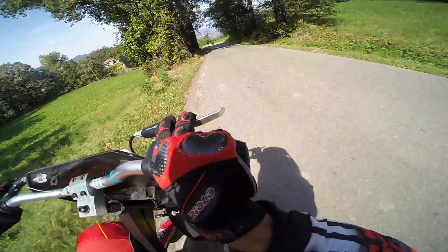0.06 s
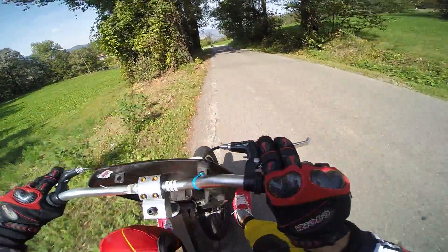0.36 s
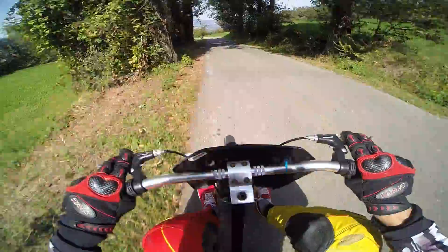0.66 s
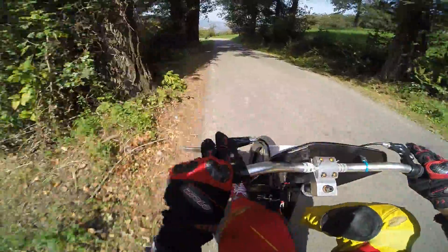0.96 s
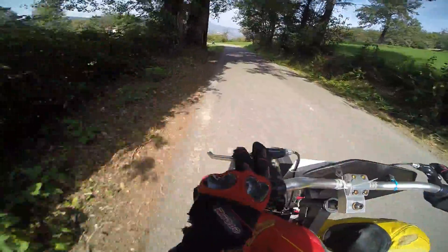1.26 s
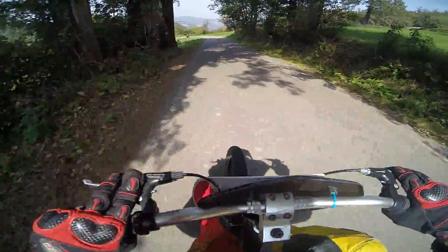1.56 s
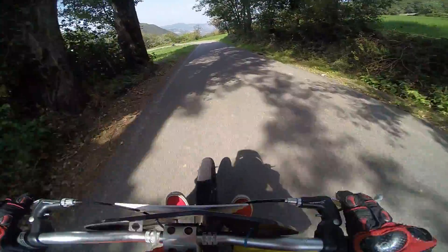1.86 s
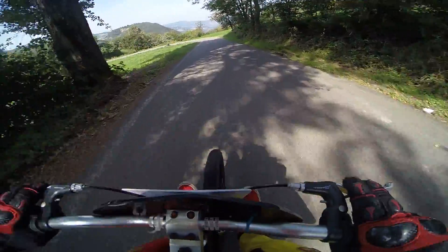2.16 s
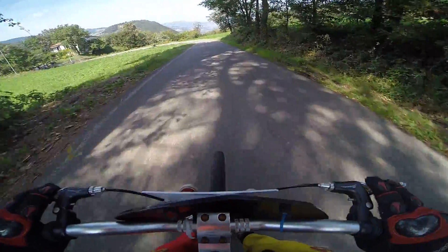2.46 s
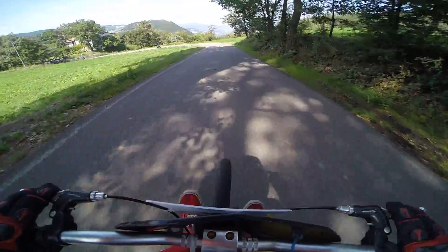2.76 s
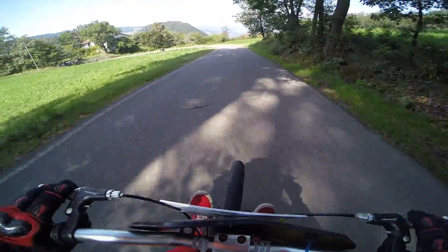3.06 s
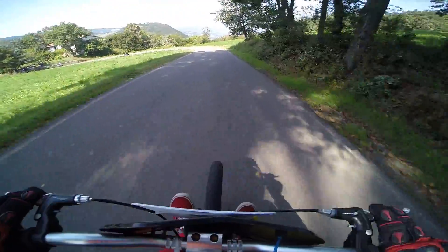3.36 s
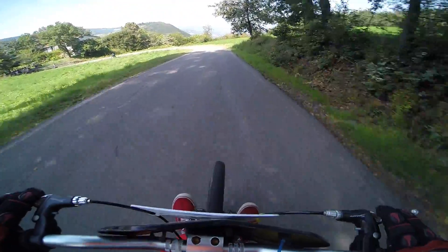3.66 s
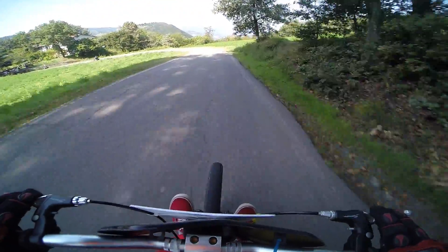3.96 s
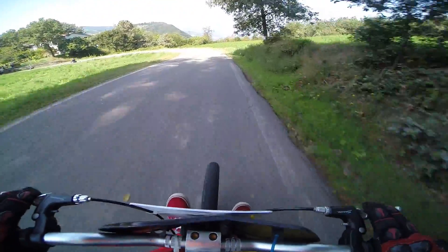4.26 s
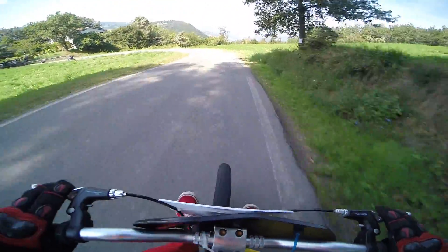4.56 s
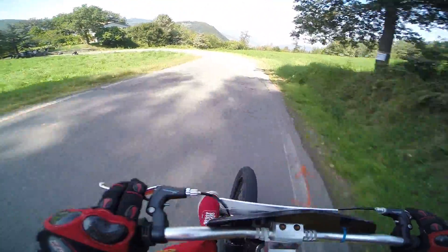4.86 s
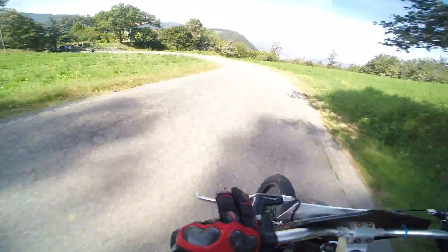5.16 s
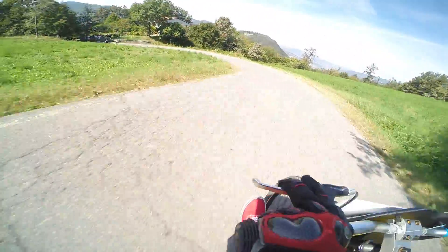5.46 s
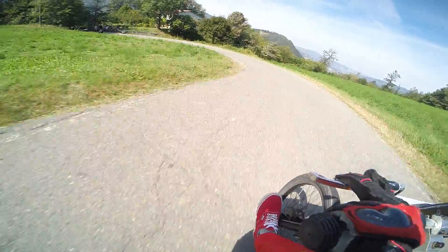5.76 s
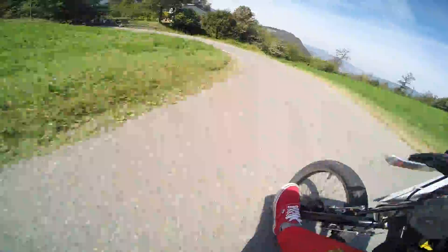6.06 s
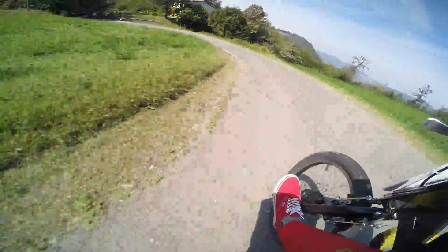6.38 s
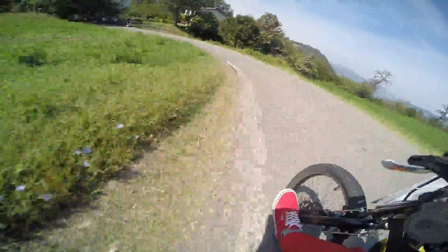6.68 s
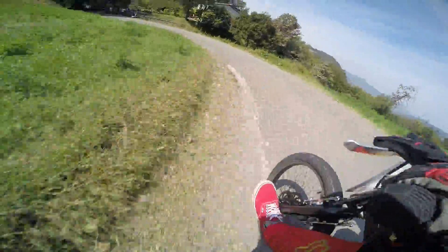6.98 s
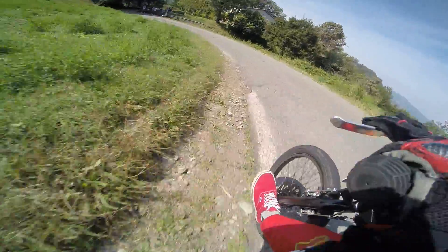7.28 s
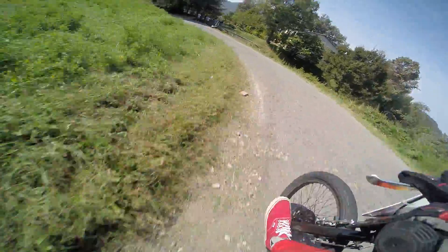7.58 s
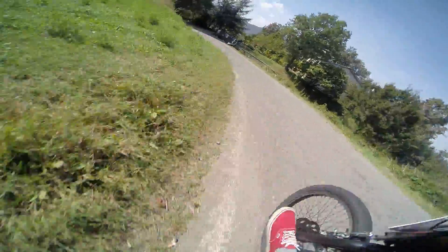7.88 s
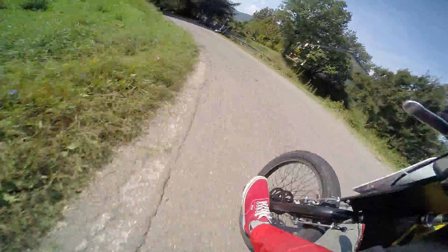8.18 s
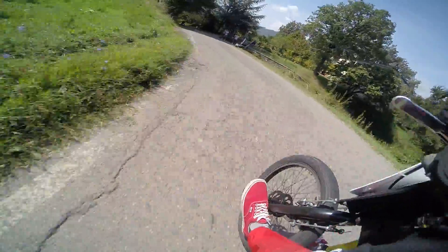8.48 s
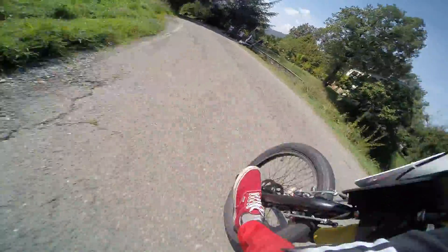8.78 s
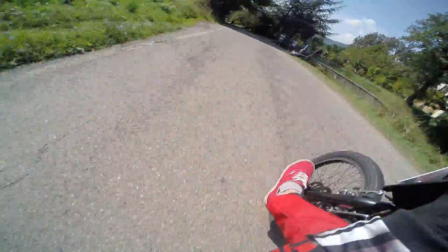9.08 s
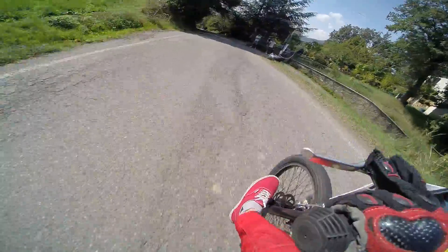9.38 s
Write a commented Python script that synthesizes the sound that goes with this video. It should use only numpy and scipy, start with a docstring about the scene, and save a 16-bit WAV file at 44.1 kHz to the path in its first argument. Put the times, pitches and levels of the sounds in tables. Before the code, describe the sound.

A drift trike coasts on asphalt, heard close from the rider, with gusty wind thumping and fluttering on the microphone throughout. It opens with a short rasping skid, hissing grit and a few knocks in the first second. From about 1 to 5 seconds the hollow plastic wheels drum with a wavering, low-middle drone and a higher ringing scrub over a dull road roar; the frame clanks occasionally and loose fittings tick. From 5.2 seconds grit returns and the wheels swing into a sideways slide, juddering in rapid, ringing grabs, densest between 6.2 and 6.6 seconds. Around 7.4 to 8 seconds gravel crunches, stones crack against the steel frame and bumps come in a cluster. The drone then thins. A hard, ringing knock lands near 8.8 seconds, followed by more stone clicks and smaller bumps, and the wheels scrub on until about 9.5 seconds.

```python
"""Drift trike sliding through a bend

A trike coasts down an asphalt lane, heard from a microphone on the rider. The road grain excites the
modes of the hollow plastic rear wheels; sliding sideways, their sleeves judder and ring by stick-slip
friction. Bumps knock through the chassis, grit and stones crackle against the steel frame, loose
fittings tick, and turbulent air buffets the microphone."""
import sys
import numpy as np
from scipy import signal
from scipy.fft import rfft, irfft
from scipy.io import wavfile
from scipy.ndimage import uniform_filter1d, minimum_filter1d

SR = 44100
rng = np.random.default_rng(int(sys.argv[2]) if len(sys.argv) > 2 else 0)


def dump(signal):
    """Clip the signal to [-1, 1] and save it as 16-bit WAV at the path in sys.argv[1]."""
    limited = np.clip(np.atleast_2d(signal).T, -1, 1)
    pcm = np.round(limited * 32767).astype(np.int16)
    wavfile.write(sys.argv[1], SR, pcm)


N = 415863
TIME = np.arange(N) / SR


# Lower and upper mode pairs of the hollow wheels: (frequency [Hz], bandwidth [Hz], gain [dB])
LOWER_MODES = [(334.5, 46, 2.5), (370.8, 46.5, 2.5)]
UPPER_MODES = [(433.4, 54, 1.5), (460.6, 55, -4.5)]
# The drumming's lower and upper notes, wavering irregularly in pitch: (time [s], frequency [Hz])
LOWER_NOTE = [(0.7, 328), (1.37, 362.6), (2.56, 338.4), (2.73, 375), (2.89, 338.9), (3.3, 378.6),
              (3.37, 357.3), (4.61, 380), (4.74, 341.5), (5.05, 377), (5.19, 324), (5.4, 325)]
UPPER_NOTE = [(0.7, 436), (0.86, 412.6), (0.93, 445.8), (1.09, 408), (1.17, 435), (2.09, 425),
              (2.49, 440.5), (2.61, 412), (2.73, 442), (2.98, 428.7), (5.03, 439.4), (5.4, 412)]
# Strength of the drumming: (time [s], lower pair [dB], upper pair [dB])
DRUM_LEVELS = [(0, -29.5, -32), (.68, -24.5, -28), (.88, -15.5, -21.5), (1.1, -21.5, -20), (1.5, -25, -21),
               (1.85, -20, -18.5), (2.08, -20.5, -19), (2.35, -16, -15.5), (2.68, -16.5, -17),
               (3.2, -26, -29), (3.45, -19, -19), (3.9, -20.5, -17), (4.1, -21.5, -22), (4.3, -21.5, -16),
               (4.68, -16.5, -18.5), (4.85, -24, -22), (5.3, -21, -24), (5.55, -30, -24.5),
               (5.95, -21.5, -22.5), (6.35, -35.5, -28.5), (6.62, -24.5, -27.5), (7.25, -27.5, -29.5),
               (7.52, -21.5, -25), (8.0, -39, -51), (8.6, -36, -25.5), (9.05, -40, -37.5),
               (9.35, -27, -24.5)]

def drumming(load):
    """Forced vibration: road grain drives the modes of the hollow wheels; the pitch wavers unevenly."""
    out = np.zeros(N)
    for column, (pair, notes) in enumerate([(LOWER_MODES, LOWER_NOTE), (UPPER_MODES, UPPER_NOTE)], 1):
        waver = np.exp(0.008 * wander(5.5))
        modes = np.zeros(N)
        for hz, width, db in pair:
            drive = grains(per_s=5000, spread_db=2) * load
            modes += gain_of(db) * resonate_twice(drive, hz * waver, width)
        drive = grains(per_s=5000, spread_db=2) * load
        note = steadied(resonate_twice(drive, curve(notes, column=1), width=24.4), span_s=0.045)
        drum = steadied(evened(modes) + gain_of(2) * note, span_s=0.095)
        out += drum * gain_of(curve(DRUM_LEVELS, column))
    return out


SLEEVE_HZ = 736.4  # note of a sleeve under side load
# Sideways scrubs of the rear wheels: (time [s], duration [s], level [dB])
SLEEVE_SCRUBS = [(0.0, 0.047, -20.5), (0.8, 0.48, -23.5), (1.16, 0.5, -24), (2.85, 1.43, -26.5),
                 (4.62, 0.84, -23.5), (5.85, 0.2, -23), (6.19, 0.55, -28), (6.66, 0.68, -27.5),
                 (7.4, 0.38, -24.5), (8.48, 0.32, -21.5), (8.98, 0.62, -24)]

def sleeves(load, drift):
    """Stick-slip excitation: grain and slips ring the sleeves; side load lowers the note, adds a mode."""
    pitch_hz = (782 * (1 - drift) + SLEEVE_HZ * drift) * np.exp(0.022 * wander(15))
    load_rise = np.maximum(np.diff(load, prepend=load[0]), 0)
    slips = evened(load_rise ** 0.64)
    drive = grains(per_s=2500, spread_db=3) * load + drift * gain_of(-2) * slips
    ring = resonate(resonate(drive, pitch_hz, width=38), pitch_hz, width=280)
    side_mode = drift * gain_of(-5) * resonate(resonate(drive, hz=567, width=61), hz=541, width=51)
    scrub = swells(SLEEVE_SCRUBS, column=2, rise_s=0.022, fall_s=0.099)
    between_scrubs = gain_of(-28)
    return steadied(ring + side_mode, span_s=0.06) * np.hypot(between_scrubs, scrub)


# A sleeve grips and lets go: (time [s], level [dB])
SLEEVE_GRABS = [(0.802, -13), (0.993, -9.5), (1.03, -12), (1.181, -11), (1.296, -12), (1.512, -10.5),
                (1.556, -13), (1.578, -11.5), (5.598, -9), (5.783, -11.5), (5.812, -13.5), (5.886, -12),
                (6.181, -10), (6.205, -6), (6.224, -12), (6.248, -7), (6.273, -12), (6.301, -11.5),
                (6.323, -12), (6.345, -12.5), (6.365, -13), (6.388, -11.5), (6.428, -11), (6.453, -10.5),
                (6.487, -9), (6.532, -4.5), (6.56, -8), (6.582, -10), (6.602, -11), (6.684, -13.5),
                (6.718, -12.5), (6.779, -16), (6.845, -11.5), (6.942, -8), (7.057, -9), (7.122, -11.5),
                (7.515, -9), (8.7, -7)]

def grabs():
    """Free vibration: a released sleeve rings in two modes, rasps faintly and jolts the chassis."""
    out = np.zeros(N)
    for s, db in SLEEVE_GRABS:
        note = ping(SLEEVE_HZ, rise_s=0.004)
        upper_mode = gain_of(-10.5) * ping(hz=1230, rise_s=0.0025)
        rasp = gain_of(-39) * scraping(pinch(rise_s=0.004))
        add(out, s, gain_of(db) * (note + upper_mode + rasp))
        add(out, s, blow(db - 11.5, ROAR_SPECTRUM, scrape=0.32, fade_s=0.004))
    return out


# The wheels hit a crack, a patch or a stone: (time [s], level [dB])
ROAD_BUMPS = [(0.193, -7), (0.293, -5), (0.617, -9.5), (1.228, -4), (1.933, -10.5), (2.055, -7),
              (5.398, -5), (5.736, -6), (6.124, -4), (6.914, -4.5), (7.314, -6), (7.76, -6), (7.871, -4),
              (7.8834, -5), (7.89, -2.5), (7.901, -3), (7.9157, -4.5), (7.989, -7), (8.085, -8),
              (8.217, -7.5), (8.3, -7.5), (8.756, 3.5), (8.893, -13), (8.913, -12.5), (8.959, -8),
              (8.987, -9), (9.014, -4.5)]
# Response of the chassis to a knock: (frequency [Hz], level [dB])
KNOCK_SPECTRUM = [(60, -12.5), (250, 1.5), (430, -4.5), (570, 2.5), (740, 3), (1000, 1), (1280, -4.5),
                  (1600, -22.5), (3200, -32.5), (6000, -55.5), (14000, -86)]

def bumps():
    """Impact excitation: a hard knock runs through the chassis and leaves a lightly damped ring."""
    out = np.zeros(N)
    for s, db in ROAD_BUMPS:
        knock = blow(db, KNOCK_SPECTRUM, scrape=0.12, fade_s=0.0072)
        add(out, s, knock + gain_of(-5.5) * resonate(knock, hz=720, width=8.2))
    return out


# A joint of the frame takes up its play: (time [s], level [dB], frequency [Hz])
JOINT_CLANKS = [(0.042, -10, 760), (0.44, -10, 930), (0.59, -9, 860), (0.708, -12, 796), (1.45, -4, 996),
                (1.932, -10, 794), (2.055, -10, 980), (2.205, -7.5, 900), (7.0995, -10, 900),
                (7.403, -6, 830), (7.771, -9, 900), (7.883, -8, 920), (7.9153, -13, 1160),
                (8.084, -15.5, 900)]

def clanks():
    """Backlash: a joint knocks home, the frame rings briefly and a faint metallic click follows."""
    out = np.zeros(N)
    for s, db, hz in JOINT_CLANKS:
        add(out, s, gain_of(db) * ping(hz, rise_s=0.0012))
        add(out, s + 0.0016, blow(db - 28, SKID_SPECTRUM, scrape=0.8, fade_s=0.003))
    return out


# The lane presses the wheels down (+) or lets them go light (-): (time [s], duration [s], gain [dB])
LANE_HEAVES = [(0.283, 0.096, -5.5), (1.047, 0.15, -1), (1.248, 0.084, 4.5), (2.326, 0.099, -0.5),
               (2.45, 0.18, -3), (3.856, 0.28, 2.5), (3.978, 0.045, -9.5), (5.426, 0.3, -1),
               (6.95, 0.061, -4), (7.925, 0.12, -4), (8.227, 0.06, -5), (8.778, 0.085, -4),
               (9.03, 0.18, -1.5)]

def wheel_sway():
    """Amplitude modulation: wheel noise follows the heaves and dips before each bump, clank or grab."""
    drops = [(row[0] - 0.021, 0.021, -3.5) for row in [*ROAD_BUMPS, *JOINT_CLANKS]]
    sticks = [(s - 0.014, 0.014, -4.5) for s, _ in SLEEVE_GRABS]  # a gripping sleeve is quieter
    db = np.zeros(N)
    for s, length, depth in [*LANE_HEAVES, *drops, *sticks]:
        add(db, s, depth * np.sin(np.pi * np.arange(0, length, 1 / SR) / length))
    return gain_of(db + 1.02 * wander(5.6))


# Rolling on clean asphalt: (time [s], roar [dB], rasp [dB])
ROLLING_LEVELS = [(0.0, -16.5, -40), (0.5, -27.5, -44.5), (0.89, -21.5, -43.5), (1.13, -21, -46),
                  (1.5, -21, -47), (2.0, -22, -42.5), (2.35, -19, -39.5), (2.8, -18, -40),
                  (3.22, -23.5, -40), (3.4, -21.5, -40.5), (3.85, -17.5, -38.5), (4.1, -23, -40.5),
                  (4.62, -18, -38.5), (5.6, -23, -45), (5.95, -20, -44), (6.3, -22, -43.5),
                  (7.0, -22.5, -42), (7.55, -24, -39), (8.05, -25.5, -52), (9.1, -24.5, -43.5),
                  (9.43, -22.5, -41)]
# Roar of the frame and rasp of the tread: (frequency [Hz], level [dB])
ROAR_SPECTRUM = [(100, -24.5), (300, -9.5), (490, -1), (580, -11.5), (700, 4), (770, -2), (890, 4.5),
                 (1020, -0.5), (1140, -1), (1280, -2), (1410, -14.5), (1490, -9.5), (1660, -20),
                 (2000, -22), (2600, -37), (6000, -70)]
RASP_SPECTRUM = [(700, -13), (1500, 0), (2000, 1.5), (2450, 0), (2850, 1.5), (3300, 4.5), (3900, -7),
                 (4500, -13.5), (5120, -10.5), (5600, -17.5), (7100, -22), (8200, -34.5), (9000, -25.5),
                 (11500, -49.5), (15000, -71.5)]

def rolling(load, sway, crunch):
    """Roughness excitation: the frame roars dully and the tread rasps, both louder on gravel."""
    roar = coloured(grains(per_s=3000, spread_db=0.85) * load, ROAR_SPECTRUM)
    rasp = coloured(grains(per_s=8300, spread_db=3) * load ** 0.82, RASP_SPECTRUM)
    roar_level = sway * np.hypot(gain_of(curve(ROLLING_LEVELS, column=1)), gain_of(14.5) * crunch)
    rasp_level = sway ** 0.076 * np.hypot(gain_of(curve(ROLLING_LEVELS, column=2)), crunch)
    return steadied(roar, span_s=0.11) * roar_level + steadied(rasp, span_s=0.19) * rasp_level


# Gusts on the microphone: (time [s], duration [s], thump [dB], flutter [dB])
WIND_GUSTS = [(0.05, 0.67, -20.5, -22.5), (0.8, 0.14, -35, -16.5), (1.21, 0.19, -21, -20),
              (1.38, 0.41, -25.5, -24), (2.8, 0.5, -22.5, -18), (3.45, 0.57, -28.5, -25),
              (4.12, 0.1, -29, -40), (4.7, 0.72, -23, -18), (5.42, 1.59, -26, -21.5),
              (7.12, 0.23, -28, -26.5), (7.44, 0.4, -20, -17.5), (8.07, 0.12, -32, -25),
              (8.3, 0.46, -22.5, -19.5)]
# Pressure of the large and the small eddies: (frequency [Hz], level [dB])
THUMP_SPECTRUM = [(10, -11.5), (25, -11), (45, -4.5), (80, -3.5), (110, -6.5), (160, -26), (400, -44.5),
                  (2000, -84.5)]
FLUTTER_SPECTRUM = [(30, -27.5), (75, -17), (115, -0.5), (200, 1), (270, -3), (520, -6), (800, -12.5),
                    (1300, -20), (2000, -41), (6000, -73.5)]

def wind():
    """Turbulence: large eddies thump the microphone and small ones flutter; both swell in gusts."""
    thump = steadied(coloured(rng.standard_normal(N), THUMP_SPECTRUM), span_s=0.24)
    small_eddies = coloured(rng.standard_normal(N), FLUTTER_SPECTRUM)
    flutter = steadied(small_eddies * gain_of(1.2 * wander(6.6)), span_s=0.091)
    # the gusts add in power to a steady air stream
    thump_level = np.hypot(gain_of(-31), swells(WIND_GUSTS, column=2, rise_s=0.098, fall_s=0.046))
    flutter_level = np.hypot(gain_of(-25), swells(WIND_GUSTS, column=3, rise_s=0.098, fall_s=0.046))
    return thump * thump_level * gain_of(1.3 * wander(3.5)) + flutter * flutter_level


# Larger stones under the wheels; the row at 6.533 s instead gives a sleeve grab a harsher rasp: (time [s],
# relative level [dB], frequency [Hz], rise time [s])
STONE_CRACKS = [(0.596, -20.5, 3160, 0.002), (0.615, -13, 2840, 0.0021), (0.6644, -15.5, 2020, 0.0018),
                (0.7117, -20.5, 1750, .002), (5.467, -20.5, 2480, 0.0018), (5.6474, -19, 3380, 0.0014),
                (6.533, -23, 2137, 0.0021), (6.9904, -32, 2670, 0.0033), (7.0764, -22, 4080, 0.00083),
                (7.1114, -20, 3320, .0016), (7.1248, -19, 3000, .0016), (7.1707, -23, 3400, .0016),
                (7.22, -22, 3930, 0.0018), (7.3274, -20, 3110, .0016), (7.4058, -25, 2860, .003),
                (7.443, -28, 3210, .003), (7.4866, -32, 3100, 0.0018), (7.497, -14, 3100, 0.002),
                (7.6278, -20, 2850, .0016), (7.655, -22, 2850, .004), (7.6776, -18, 3080, .003),
                (7.6956, -19, 3160, .003), (7.7276, -25, 3170, 0.0017), (7.7705, -24, 2750, .003),
                (7.8006, -18.5, 3150, 0.0017), (7.821, -30, 2800, .003), (7.832, -21, 2800, .003),
                (7.8732, -17, 3100, .002), (7.8822, -14, 3310, .002), (7.893, -18, 2230, .003),
                (7.9133, -10.5, 3450, .0014), (7.96, -17, 5000, 0.0014), (7.9803, -15.5, 1940, .0016),
                (8.0162, -6.5, 3000, 0.0018), (8.0532, -20, 2680, .0016), (8.3016, -17, 3000, 0.0034),
                (8.7555, -21, 2900, .0012), (8.8238, -27, 1650, 0.0047), (8.8412, -16.5, 2520, 0.0023),
                (8.891, -16, 2950, .0025), (8.9115, -23, 4260, 0.0033), (8.9267, -18, 2310, 0.0025),
                (8.9346, -16, 2590, 0.0027), (8.9558, -15, 2370, 0.0017), (8.985, -14.5, 2230, 0.0022),
                (8.996, -17, 3400, .0016), (9.0138, -21, 1910, 0.0018), (9.0518, -25, 2400, .003),
                (9.067, -18, 2240, .0016), (9.077, -25, 2220, 0.0018), (9.119, -21.5, 1680, 0.002),
                (9.1697, -22, 3400, .0016), (9.233, -22.5, 2000, 0.0014), (9.2845, -23, 3600, 0.00097)]
# Dry scrape of a stone: (frequency [Hz], level [dB])
STONE_SPECTRUM = [(200, -17.5), (800, 1.5), (1600, 12.5), (2100, 2.5), (2900, 5.5), (4000, 0.5), (5200, -7),
                  (6200, -10), (9500, -23), (12000, -27), (15000, -32.5)]

def stones(crunch, clumps):
    """Contact transients: each pinched stone cracks and rings at its own pitch; small ones cluster."""
    small = patter(hz=3000, spread_hz=1300, rise_s=0.0012, spread_db=1.5, scrape_db=-0.5, count=2400)
    out = evened(small * clumps) * crunch * gain_of(-5)
    for s, db, hz, rise_s in STONE_CRACKS:
        crack = scraping(pinch(rise_s))
        ring = gain_of(-12.5) * ping(hz, rise_s)
        add(out, s, gain_of(db) * (crack / abs(crack).max() + ring))
    return out


# Broadside skids on asphalt or the sandy verge: (time [s], duration [s], level [dB])
WHEEL_SKIDS = [(-0.02, 0.088, -40.5), (0.08, 0.089, -37.5), (0.185, 0.113, -37), (7.44, 0.15, -46.5),
               (7.65, 0.253, -45.5)]
# Rasp of a skid: (frequency [Hz], level [dB])
SKID_SPECTRUM = [(800, -23), (1900, 4), (2500, -8), (3350, 8), (4000, -3), (4500, -8), (5120, 2),
                 (5800, -11), (7300, -9), (8200, -16), (9300, -14.5), (10000, -11.5), (11200, -27),
                 (13000, -28), (15000, -30)]

def skids():
    """Sliding friction: a wheel tears broadside over the road grain in a dense, bright rasp."""
    tearing = 0.8 + jolts(per_s=110, jitter=0.6, fade_s=0.004, spread_db=2)
    rasp = coloured(grains(per_s=9000, spread_db=1.5) * tearing, SKID_SPECTRUM)
    return steadied(rasp, span_s=0.031) * swells(WHEEL_SKIDS, column=2, rise_s=0.018, fall_s=0.02)


# Patches of dirt under the wheels: (time [s], duration [s], grit spray [dB], gravel crunch [dB])
DIRT_PATCHES = [(0.0, 0.21, -50, -43), (0.19, 0.12, -48, -42), (0.305, 0.43, -48, -44),
                (0.735, 0.19, -49.5, -43), (0.905, 0.11, -66, -61), (1.22, 0.078, -57, -52),
                (2.22, 0.48, -60, -67), (5.25, 0.18, -52, -47), (5.9, 0.72, -62, -50),
                (6.92, 0.48, -53, -54), (7.4, 0.21, -56, -38.5), (7.64, 0.286, -54, -36.5),
                (7.93, 0.9, -51, -45), (8.66, 0.39, -52, -47), (8.822, 0.039, -49, -38),
                (8.89, 0.058, -45, -31.5), (9.05, 0.2, -60, -63)]

def dirt():
    """Incoherent addition: the patches sum in power to the envelopes of spray and crunch."""
    spray = swells(DIRT_PATCHES, column=2, rise_s=0.035, fall_s=0.021)
    crunch = swells(DIRT_PATCHES, column=3, rise_s=0.035, fall_s=0.021)
    return spray * gain_of(1.5 * wander(12)), crunch


# Sand spraying off the wheels: (frequency [Hz], level [dB])
GRIT_SPECTRUM = [(800, -27.5), (2000, -6), (3200, 8), (4400, 0.5), (5150, 11), (5700, 2), (7100, 5),
                 (8000, 3.5), (10200, -8), (11300, -19.5), (13000, -13.5), (15300, -25)]

def grit(spray):
    """Shot noise: sand crushed in clumps makes a gritty hiss, its top treble cut when it is quiet."""
    floor = gain_of(curve(ROLLING_LEVELS, column=2) - 24)  # present even on clean asphalt
    level = np.hypot(spray, floor)
    clumps = 0.7 + jolts(per_s=55, jitter=0.8, fade_s=0.004, spread_db=2)
    hiss = steadied(coloured(grains(per_s=1800, spread_db=2.5) * clumps, GRIT_SPECTRUM), span_s=0.062)
    dull_hiss = signal.sosfilt(signal.butter(8, 10300, fs=SR, output="sos"), hiss)
    brightness = np.clip((20 * np.log10(level) + 57) / 12, 0, 1)
    return (np.sqrt(1 - brightness) * dull_hiss + np.sqrt(brightness) * hiss) * level


# Rings of flicked pebbles: (frequency [Hz], frequency spread [Hz], relative level [dB])
PEBBLE_RINGS = [(1680, 300, -4.5), (2160, 360, 0), (3150, 1100, 2), (4350, 530, -6.5), (5150, 400, -5)]

def pebbles(level, clumps):
    """Random impacts: pebbles patter against the frame in handfuls where the lane is dirty."""
    clicks = np.zeros(N)
    for hz, spread_hz, db in PEBBLE_RINGS:
        clicks += gain_of(db) * patter(hz, spread_hz, rise_s=0.00039, spread_db=4, scrape_db=-1,
                                       count=1100)
    return evened(clicks * clumps) * level * gain_of(5.5)


# Brake cables and loose clamps strike the handlebar: (time [s], relative level [dB])
FITTING_TICKS = [(0.305, -29.5), (0.388, -36), (1.1274, -43), (1.2303, -43), (1.7814, -41), (1.8848, -46),
                 (2.239, -37.5), (2.3615, -37), (2.4101, -46), (2.532, -45), (2.555, -43), (2.6037, -42),
                 (2.6576, -44), (2.7164, -44), (4.6199, -36.5), (4.7712, -37), (4.8091, -38), (4.8196, -39),
                 (4.8435, -39), (4.8635, -44), (4.9099, -43), (4.947, -34.5), (4.9797, -39), (5.06, -39),
                 (5.07, -42), (5.1458, -37), (5.17, -42), (5.2266, -36), (5.2745, -35), (5.288, -38),
                 (5.48, -36), (7.4125, -30), (7.425, -34), (7.531, -36), (7.572, -36), (7.648, -31),
                 (8.234, -37), (8.673, -31), (8.681, -34), (8.893, -29), (8.9116, -25)]
# One tick: (frequency [Hz], level [dB])
TICK_SPECTRUM = [(1500, -31.5), (4500, 2.5), (6200, -2.5), (7400, -5.5), (8700, -7), (10300, -10),
                 (11500, -20), (13000, -18.5), (15000, -37.5)]
# Modes of the clamps: (frequency [Hz], bandwidth [Hz], gain [dB])
CLAMP_MODES = [(6430, 200, -3), (8560, 160, 7), (9800, 200, -3)]

def fittings():
    """Rattle: loose parts strike the handlebar, and each tick excites the modes of the clamps."""
    ticks = np.zeros(N)
    for s, db in FITTING_TICKS:
        add(ticks, s, blow(db, TICK_SPECTRUM, scrape=0.6, fade_s=0.0045))
    return gain_of(1.5) * ticks + sum(gain_of(db) * resonate(ticks, hz, w) for hz, w, db in CLAMP_MODES)


# Modes of the steel frame and handlebar: (frequency [Hz], bandwidth [Hz], gain [dB])
FRAME_MODES = [(2850, 47, -6.5), (3270, 55, -11.5), (5090, 210, -7), (7070, 45, -2.5), (10090, 60, -1.5),
               (10550, 70, 4), (12930, 140, -5.5)]

def through_frame(x):
    """Structure-borne sound: the steel tubes add their thin modes to whatever touches them."""
    return x + sum(gain_of(db) * resonate(x, hz, width) for hz, width, db in FRAME_MODES)


def hub(drift):
    """Modulated narrow-band noise: a faint whine pulses about once a wheel turn, fading in the slide."""
    turns_per_s = 5
    whine = evened(resonate_twice(rng.standard_normal(N), hz=9050, width=540))
    pulse_db = 3.5 * np.sin(2 * np.pi * turns_per_s * TIME) + 2.5 * wander(12)
    return whine * (1 - drift) * gain_of(-76 + pulse_db)


def grains(per_s, spread_db):
    """Poisson process: tiny random impacts, many small and a few large."""
    size = gain_of(spread_db * np.minimum(rng.exponential(1, N), 4))
    return evened(size * rng.choice([-1, 1], N) * (rng.random(N) < per_s / SR))


def jolts(per_s, jitter, fade_s, spread_db):
    """Relaxation oscillation: uneven stick and slip, each release starting at once and dying away."""
    cycles = np.cumsum(per_s * np.exp(jitter * wander(per_s))) / SR
    strength = gain_of(spread_db * np.clip(rng.standard_normal(N), -2, 2))
    slips = np.diff(np.floor(cycles), prepend=0) * strength
    return evened(signal.lfilter([1], [1, -np.exp(-1 / (fade_s * SR))], slips))


def patter(hz, spread_hz, rise_s, spread_db, scrape_db, count):
    """Superposition: small stones scrape and ring, each with its own pitch, length and strength."""
    rings, force = np.zeros(N), np.zeros(N)
    for when, pitch, length, luck in rng.random((count, 4)):
        s, stretch = when * N / SR, 0.5 + length
        strength = gain_of(-spread_db * np.log(luck + 0.02))
        add(rings, s, strength * ping(hz + spread_hz * (pitch - 0.5), rise_s * stretch, size=400))
        add(force, s, strength * pinch(rise_s=0.00063 * stretch, size=400))
    return evened(evened(rings) + gain_of(scrape_db) * evened(scraping(force)))


def blow(db, spectrum, scrape, fade_s, size=3000):
    """Source and filter: an impulse and a short scrape, coloured by the body they strike."""
    t = np.arange(size) / SR
    hit = coloured((t == 0) + scrape * rng.standard_normal(size) * np.exp(-t / fade_s), spectrum)
    return gain_of(db) * hit / abs(hit).max()


def scraping(force):
    """Friction noise: a dry, stony scrape in proportion to the contact force."""
    return coloured(force * rng.standard_normal(len(force)), STONE_SPECTRUM)


def pinch(rise_s, size=2400):
    """Critically damped pulse: a contact force that peaks at rise_s and dies away."""
    u = np.arange(size) / (rise_s * SR)
    return u * np.exp(1 - u)


def ping(hz, rise_s, size=2400):
    """Damped oscillation: a short ring at one pitch."""
    return pinch(rise_s, size) * np.sin(2 * np.pi * hz * np.arange(size) / SR)


def resonate(x, hz, width):
    """Resonance of gain 1 and a bandwidth in Hz; it can follow a pitch curve."""
    turn = np.exp(2j * np.pi * np.cumsum(hz * np.ones(len(x))) / SR)
    decay = np.exp(-np.pi * width / SR)
    return 2 * (turn * signal.lfilter([1 - decay], [1, -decay], x / turn)).real


def resonate_twice(x, hz, width):
    """Cascade: two equal resonances give steeper skirts."""
    return resonate(resonate(x, hz, width), hz, width)


def coloured(x, spectrum, size=4096):
    """Minimum-phase filtering: shapes a sound by a spectrum, with an impulse response of energy 1."""
    hz, db = np.transpose(spectrum)
    log_hz = np.log(abs(np.fft.fftfreq(size, 1 / SR)) + 1)
    log_gain = np.log(gain_of(np.interp(log_hz, np.log(hz), db)))
    response = np.fft.ifft(np.exp(np.conj(signal.hilbert(log_gain)))).real[:size // 2]
    return signal.oaconvolve(x, response / np.linalg.norm(response))[:len(x)]


def wander(hz):
    """Band-limited noise: a slow fluctuation of rms 1, up to about a given rate."""
    ratio = np.fft.rfftfreq(N, 1 / SR) / hz
    return evened(irfft(rfft(rng.standard_normal(N)) * ratio / (1 + ratio ** 2) ** 2, N))


def swells(rows, column, rise_s, fall_s):
    """Power summation: the joint amplitude of events that each rise, hold and fall."""
    power = np.zeros(N)
    for row in rows:
        start, end = row[0], row[0] + row[1]
        shape = np.clip(np.minimum((TIME - start) / rise_s, (end - TIME) / fall_s) + 0.5, 0, 1)
        power += (shape * gain_of(row[column])) ** 2
    return np.sqrt(power)


def curve(rows, column):
    """Linear interpolation of one table column at every sample."""
    rows = np.asarray(rows)
    return np.interp(TIME, rows[:, 0], rows[:, column])


def steadied(x, span_s):
    """Running normalisation: rms 1 over a span, with the quick flutter left in."""
    return x / np.sqrt(abs(uniform_filter1d(x ** 2, int(span_s * SR) + 1)) + 1e-9)


def evened(x):
    """Normalisation to rms 1."""
    return x / np.sqrt(np.mean(x ** 2) + 1e-20)


def gain_of(db):
    """Decibels to amplitude."""
    return 10 ** (np.asarray(db) / 20)


def add(mix, s, sound):
    """Superposition of a sound on a mix at time s."""
    part = mix[max(round(s * SR), 0):][:len(sound)]
    part += sound[:len(part)]


# The swing from rolling straight to sliding sideways: (start [s], end [s])
SWING_S = [5.2, 6.2]

def scene():
    """Common excitation: one jolting load makes the wheels chatter when straight, judder in the bend."""
    drift = np.interp(TIME, SWING_S, [0, 1])  # 0 rolling straight, 1 sliding sideways
    judder = 0.25 + 0.15 * drift  # share of the load that comes in jolts
    load = 1 - judder + judder * jolts(per_s=41, jitter=0.33, fade_s=0.0052, spread_db=6)
    sway = wheel_sway()
    spray, crunch = dirt()
    fling = gain_of(4 * (drift - 0.5))  # sliding wheels throw more stones
    clumps = gain_of(7.2 * wander(35))  # stones lie in little heaps
    contact = (rolling(load, sway, crunch) + grit(spray) + pebbles(spray * fling, clumps)
               + stones(crunch * fling, clumps) + fittings())
    wheels = sway * (drumming(load ** 0.7) + sleeves(load, drift)) + hub(drift)
    frame = gain_of(-2) * through_frame(contact)
    return (wheels + frame + wind() + bumps() + grabs() + clanks() + skids())[None]


def record(dry):
    """Peak limiting and band limiting: a fast gain dip tames the peaks, then a low-pass trims the top."""
    ceiling, cutoff_hz = gain_of(-0.5), 15400
    needed_gain = np.minimum(1, ceiling / (abs(dry[0]) + 1e-9))
    limited = dry * uniform_filter1d(minimum_filter1d(needed_gain, size=200), size=200)
    low_pass = signal.firwin(511, cutoff_hz, window=("kaiser", 9), fs=SR)
    return signal.oaconvolve(limited, low_pass[None], "same")


dry = scene()
out = record(dry)
dump(out)
```